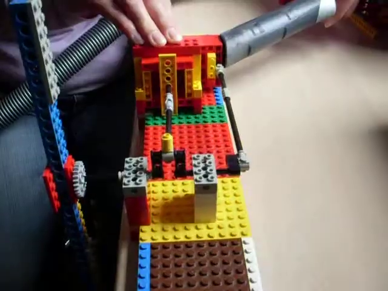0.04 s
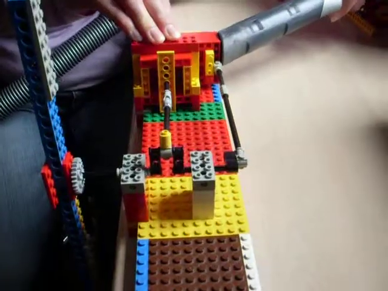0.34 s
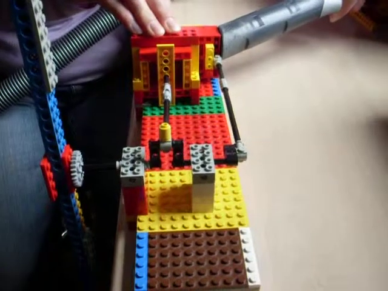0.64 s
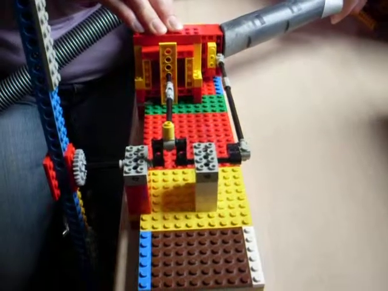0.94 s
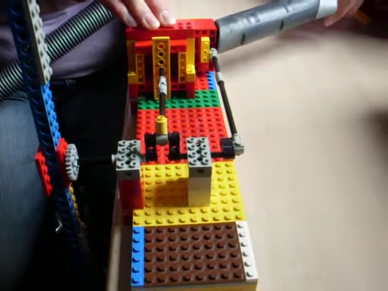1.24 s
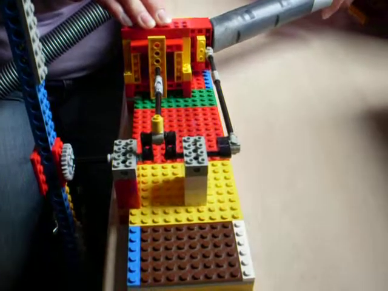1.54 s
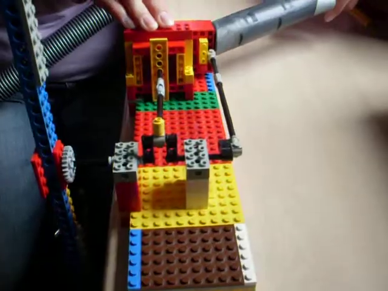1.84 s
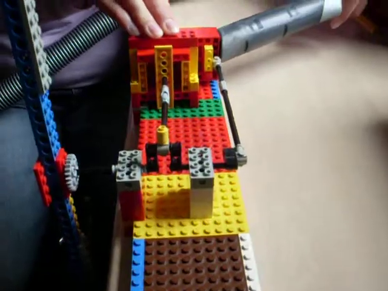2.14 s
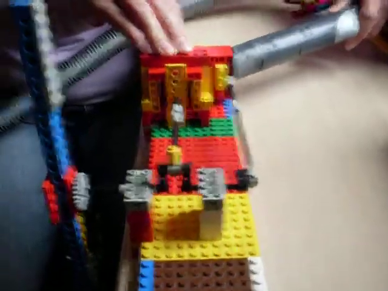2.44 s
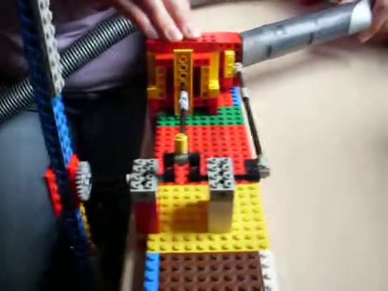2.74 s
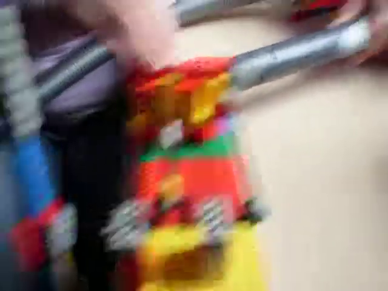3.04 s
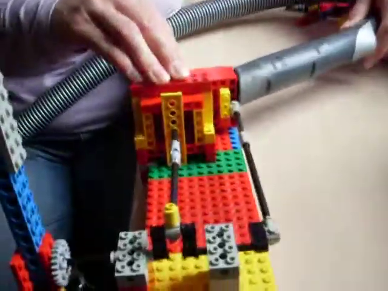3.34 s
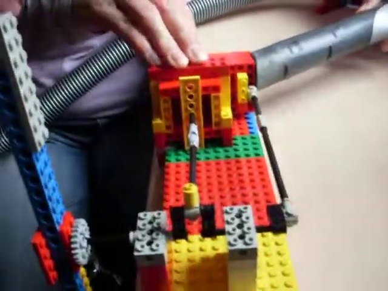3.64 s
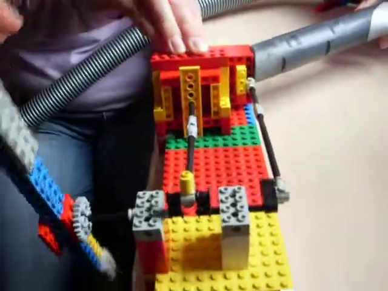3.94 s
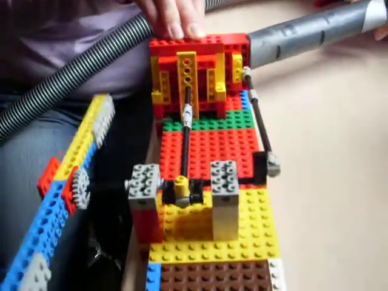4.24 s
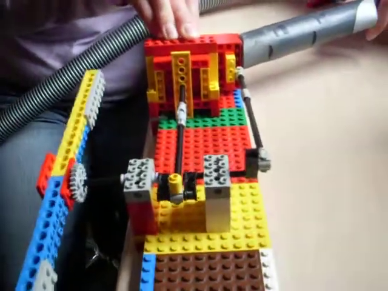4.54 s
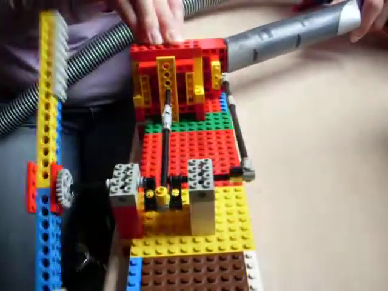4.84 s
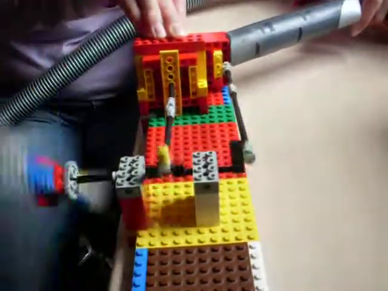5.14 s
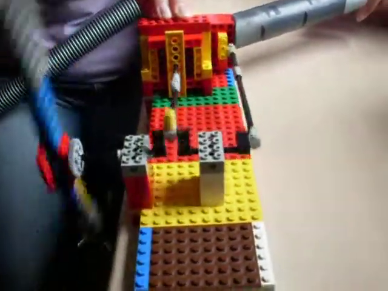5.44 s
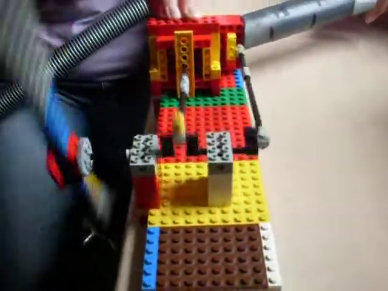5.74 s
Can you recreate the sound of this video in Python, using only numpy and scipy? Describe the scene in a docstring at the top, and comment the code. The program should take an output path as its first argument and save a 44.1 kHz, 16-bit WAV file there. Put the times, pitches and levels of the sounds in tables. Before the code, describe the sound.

A vacuum cleaner whines steadily as air hisses and whistles through a plastic brick engine, which starts chuffing near the end.

```python
"""A vacuum cleaner whines steadily while its hose sucks air through a toy engine of plastic bricks.
From the start, air rushes through the slide valve and hisses and whistles in gaps between the bricks.
After a light tap, a hand shifts the model on the table; it knocks at 1.4 s and is shifted again at 3 s.
Just after 4 s the crank is turned. Near 5 s the engine catches and chuffs faster and faster,
whistling on each suction stroke."""
import sys
import numpy as np
from scipy import signal
from scipy.fft import rfft, irfft
from scipy.io import wavfile

SR = 44100
rng = np.random.default_rng(int(sys.argv[2]) if len(sys.argv) > 2 else 0)


def wav_record(signal):
    """Record a signal, one row per channel, as 16-bit PCM in the file named by sys.argv[1]."""
    frames = np.transpose(np.atleast_2d(signal))
    bounded = np.clip(frames, -1, 1)
    # unit amplitude maps onto the largest positive 16-bit level
    quanta = np.round(bounded * 32767).astype(np.int16)
    wavfile.write(sys.argv[1], SR, quanta)


N = 260631
TIME = np.arange(N) / SR
FREQS = np.maximum(np.arange(N // 2 + 1) * SR / N, 1)

# speed of the cleaner's motor: time_s, turns_per_s
MOTOR_SPEED = [(0.05, 563.6), (0.75, 571.1), (1.2, 574.3), (1.5, 573.4), (2.0, 579.5), (2.6, 582.4),
               (3.1, 581.4), (3.4, 575.5), (4.15, 582), (5.0, 575.3), (5.85, 575.7)]
# drone of the unbalanced shaft: time_s, level_db
DRONE_LEVEL = [(0.5, -43.5), (0.95, -49.5), (1.8, -55.5), (2.2, -48), (4.0, -51), (5.91, -64)]
# whine at twice the shaft's rate: time_s, level_db
WHINE_LEVEL = [(0.15, -46), (0.55, -38.5), (0.95, -42), (2.3, -37), (3.3, -40), (3.7, -45.5), (4.35, -39.5),
               (4.6, -44.5), (5.25, -39.5)]
# thin whistle of the fan blades: time_s, level_db
BLADE_LEVEL = [(0, -58), (0.8, -42.5), (2.5, -41), (3.0, -47), (3.7, -48), (4.8, -39.5), (5.91, -39)]
# roar of the exhaust: frequency_hz, level_db (in a band 1 Hz wide)
ROAR_COLOUR = [(25, -104), (70, -105), (118, -87), (160, -99), (200, -80), (300, -84), (450, -79.5),
               (600, -77.5), (900, -76), (1200, -72.5), (2000, -72.5), (5000, -81.5)]
# where the cleaner's housing rings: pitch_hz, width_hz, lift_db
HOUSING_RINGS = [(261, 34, 5.5), (324, 35, 12.5), (414, 30, 1.5), (500, 60, 4), (642.4, 73, 11.5),
                 (709, 34, 6.5), (866, 72, 9.5), (945, 64, 8.5)]
# how much that ringing stands out: time_s, strength_factor
HOUSING_STRENGTH = [(0, 1.1), (4.0, 0.66), (4.6, 1.5), (5.91, 1.5)]
# echoes from nearby surfaces: delay_s, level_db
NEAR_ECHOES = [(.0031, -28.5), (.0074, -14), (0.0128, -14), (0.02, -23)]

# the model slides under the hand: start_s, end_s, level_db
HAND_SLIDES = [(1.154, 1.447, -46), (2.974, 3.35, -40.5)]
# tone of plastic scraping the table: frequency_hz, relative_db
SCRAPE_COLOUR = [(60, -34), (200, -11.5), (500, -1), (850, 2.5), (1500, -2.5), (1900, 2.5), (3000, 1),
                 (6000, -3.5)]
# short scuffs as it is shifted: time_s, length_s, scrape_db, rub_pitch_hz, rub_db
SLIDE_SCUFFS = [(1.187, 0.079, -55, 1400, -42), (1.338, 0.14, -35.5, 1470, -60),
                (2.995, 0.034, -33.5, 630, -37.5), (3.05, 0.057, -55, 1540, -33.5),
                (3.105, 0.045, -38, 894, -35), (3.197, 0.035, -36, 1150, -40),
                (3.257, 0.035, -37, 880, -48), (3.341, 0.022, -40, 1460, -33.5)]
# contacts of a light tap, then of the knock: start_s, strength_db, contact_s
CONTACTS = [(0.594, -21, 0.00031), (1.4416, -7.5, 0.00067), (1.4452, -14.5, 0.00021), (1.4465, -14, 0.0002),
            (1.4506, -19, 0.00031)]
# notes of the brick base on the table: pitch_hz, level_db, ring_s (time to fade by 60 dB)
BASE_NOTES = [(320, -8.5, 0.014), (444, -7, 0.02), (604, -15, 0.028), (835, -12.5, 0.049),
              (1060, -8.5, 0.018), (1460, -9, 0.02), (1620, -4, 0.019), (1720, -1, 0.016),
              (2350, -20, .015)]

# tone of the rush at the valve: frequency_hz, relative_db
RUSH_COLOUR = [(100, -43), (300, -13), (700, -5.5), (1400, -7.5), (2000, -3.5), (2700, 2), (3150, -5),
               (3700, -3), (4200, -2), (5200, -2), (5900, -2), (7000, -20), (9000, -27)]
# where the cylinder's cavities ring: pitch_hz, width_hz, lift_db
CYLINDER_RINGS = [(1484, 244, 9.5), (1836, 210, 7), (2380, 330, 6.5), (3550, 470, 4), (3960, 280, 1.5),
                  (4670, 520, 7), (5510, 94, 10), (5960, 260, -5)]
# the same with the piston near mid-stroke: pitch_hz, width_hz, lift_db
MID_STROKE_RINGS = [(1410, 240, 10), (1760, 310, -9.5), (2240, 240, 6), (3510, 540, 5.5), (4350, 320, 5),
                    (4800, 330, 2.5), (5340, 450, 3.5)]
# how near the piston rests to mid-stroke: time_s, share (0 to 1)
MID_STROKE_SHARE = [(2.95, 0), (3.2, 1), (4.1, 0.4), (4.3, 0.2)]
# tone of the hiss at the leaks: frequency_hz, relative_db
LEAK_COLOUR = [(3000, -31), (5000, -7.5), (5850, -0.5), (6200, 3), (7100, 2), (7550, 2), (8000, -13.5),
               (9000, -42)]
# tone of the higher hiss at the narrowest cracks: frequency_hz, relative_db
CRACK_COLOUR = [(6000, -36), (8000, 5), (8600, 4.5), (9500, 1.5), (10300, 1.5), (11000, -4), (11700, -12.5),
                (12300, -63)]
# strength of that higher hiss with the valve shut: time_s, level_db
CRACK_LEVEL = [(0.03, -43.5), (0.14, -41), (0.28, -39.5), (0.51, -44), (1.67, -44), (2.9, -40.5),
               (3.28, -43.5), (3.72, -40.5), (4.12, -41)]
# where the hollows under the bricks ring: pitch_hz, width_hz, lift_db
HOLLOW_RINGS = [(6100, 160, 1), (6660, 570, 2), (7040, 68, 2), (8950, 250, 5), (9700, 250, 5),
                (10100, 250, 1.5)]
# the hand's grip shifts the bricks and air surges past: start_s, end_s, rush_change_db, leak_change_db
GRIP_SURGES = [(-0.1, 0.47, 3.5, 0.5), (0.25, 0.457, 3, 2), (0.542, 0.944, 1.3, 2), (1.09, 1.48, 2, 1),
               (1.113, 1.292, 0.5, 3), (2.586, 3.36, 1.5, 1.5), (3.02, 3.137, 2.5, 5.5),
               (3.156, 3.26, -0.5, -16), (4.16, 4.34, 5.5, 3.5)]
# gaps that sing while the crank stands or creeps: start_s, end_s, pitch_hz, level_db
GAP_NOTES = [(-0.05, 0.465, 3806, -36.5), (-0.05, 0.465, 2500, -45), (0.25, 0.448, 4556, -31),
             (0.5, 1.14, 6350, -50), (1.1, 2.6, 5370, -44.5), (1.1, 3.0, 3615, -43.5),
             (1.5, 3.0, 4564, -42), (2.5, 4.1, 7050, -37), (2.65, 4.15, 9460, -47),
             (2.698, 3.025, 2414, -37.5), (3.15, 4.1, 4270, -40), (3.2, 3.294, 2300, -33),
             (3.3, 4.3, 2220, -47.5), (4.17, 4.298, 10450, -42), (4.213, 4.35, 3605, -31),
             (4.26, 4.392, 6080, -30), (4.658, 4.79, 3920, -31), (4.778, 4.94, 3660, -26),
             (4.86, 4.93, 5100, -26)]

# the hand starts the crank: time_s, turns (0 is the start of the first suction stroke)
HAND_CRANK = [(4.1, -0.14), (4.27, 0.01), (4.4, 0.096), (4.9, 0.085), (4.94, 0.22), (5.03, 0.385)]
# notes of each suction stroke: start_turns, end_turns, mid_stroke_hz, droop_hz, width_hz, level_db
VALVE_NOTES = [(0.01, 0.42, 5406, -0.5, 900, -33.5), (0.085, 0.27, 3970, 300, 520, -29),
               (0.135, 0.41, 5430, 850.5, 373, -24.5), (0.37, 0.493, 3900, 400, 450, -28.5)]
# tone of a chuff's gulp of air: frequency_hz, relative_db
GULP_COLOUR = [(300, -26), (1000, -11), (1900, -3), (3100, -6.5), (4200, -1.5), (5500, 2.5), (6600, -0.5),
               (7800, -22), (9500, -28), (10200, -7), (11000, -25), (12000, -29)]
# chuffs as the valve changes over: time_s, length_s, gulp_db, bark_pitch_hz, bark_db
VALVE_CHUFFS = [(5.097, 0.017, -22.5, 2330, -27.5), (5.235, .018, -21.5, 2400, -33),
                (5.45, 0.017, -26.5, 2220, -32.5), (5.562, 0.014, -24, 2150, -41),
                (5.747, 0.019, -25, 2200, -29.5), (5.849, 0.013, -23, 2300, -30)]


def from_db(db):
    """Turn decibels into a factor to multiply by."""
    return 10 ** (np.asarray(db) / 20)


def rms_one(x):
    """Scale a signal so its average strength (rms) is 1."""
    return x / np.sqrt(np.mean(x ** 2) + 1e-20)


def curve(rows):
    """Join (time, value) points with straight lines."""
    return np.interp(TIME, *np.transpose(rows))


def swell(time_s, length_s):
    """A bell-shaped rise and fall around a moment."""
    return np.exp(-np.minimum(((TIME - time_s) / length_s) ** 2, 100) / np.sqrt(2))


def gate(x, start, end, edge):
    """Near 1 between start and end and 0 outside, with soft edges."""
    return (1 + np.tanh((x - start) / edge)) * (1 + np.tanh((end - x) / edge)) / 4


def drift(rate_hz):
    """A smooth random wobble of size 1 that changes about rate_hz times a second."""
    step, warm_up = 40, 2000
    r = np.exp(-2 * np.pi * step * rate_hz / SR)
    noise = rng.standard_normal(N // step + warm_up + 2)
    slow = signal.lfilter([1], [1, -2 * r, r * r], noise)[warm_up:]
    return np.interp(np.arange(N) / step, np.arange(len(slow)), rms_one(slow))


def colour(x, spectrum, rings=()):
    """Make some frequencies louder than others, with a bump or dip for each ring."""
    hz, db = np.transpose(spectrum)
    shape_db = np.interp(np.log(FREQS), np.log(hz), db)
    shape_db -= 24 * np.log2(np.maximum(FREQS / hz[-1], 1))  # fall 24 dB an octave past the last row
    for centre, width, lift in rings:
        shape_db += lift / (1 + (2 * (FREQS - centre) / width) ** 4)
    return irfft(rfft(x) * from_db(shape_db), N)


def resonate(x, hz, width_hz):
    """Keep the part of a sound near one pitch."""
    r = np.exp(-np.pi * width_hz / SR)
    feedback = [1, -2 * r * np.cos(2 * np.pi * hz / SR), r * r]
    return signal.lfilter(np.array([1, 0, -1]) * (1 - r * r) / 2, feedback, x)


def turbulence(flutter_db, flutter_hz):
    """White noise whose strength flutters as the air swirls."""
    return rms_one(rng.standard_normal(N) * from_db(flutter_db * drift(flutter_hz)))


def breathy_note(hz, width_hz, skirt=2.7):
    """A note blurred by the slow swirls in a jet of air."""
    swirl = rng.standard_normal((2, N))
    for band_hz in (width_hz, width_hz * skirt, 2 * width_hz * skirt):
        swirl = signal.lfilter([1], [1, -np.exp(-np.pi * band_hz / SR)], swirl)
    phase = 2 * np.pi * np.cumsum(hz * np.ones(N)) / SR
    return rms_one(swirl[0] * np.cos(phase) + swirl[1] * np.sin(phase))


def room_rumble(level_db=-80, top_hz=65):
    """The room rumbles, faint and low."""
    low_pass = signal.butter(2, top_hz, "low", fs=SR, output="sos")
    return from_db(level_db) * rms_one(signal.sosfilt(low_pass, rng.standard_normal(N)))


def add_echoes(x):
    """The table and nearby walls send back short echoes."""
    return x + sum(from_db(db) * np.interp(TIME - delay, TIME, x, left=0) for delay, db in NEAR_ECHOES)


def vacuum_cleaner(blade_count=9, hum_hz=100, hum_db=-70.5, waver_db=0.5, whine_waver_db=0.27):
    """The spinning shaft and fan sing, the mains hums, and the exhaust's roar rings the housing."""
    angle = 2 * np.pi * np.cumsum(curve(MOTOR_SPEED) + 0.25 * drift(6)) / SR
    whine = from_db(curve(WHINE_LEVEL) + whine_waver_db * drift(5.4)) * np.sin(2 * angle)
    drone = from_db(curve(DRONE_LEVEL) + waver_db * drift(13)) * np.sin(angle)
    blades = from_db(curve(BLADE_LEVEL) + waver_db * drift(2.9)) * np.sin(blade_count * angle)
    hum = from_db(hum_db) * np.sin(2 * np.pi * hum_hz * TIME)
    exhaust = rng.standard_normal(N) * np.sqrt(SR / 2)
    roar = colour(exhaust, ROAR_COLOUR)
    ringing = colour(exhaust, ROAR_COLOUR, HOUSING_RINGS) - roar
    return np.sqrt(2) * (whine + drone + blades + hum) + roar + curve(HOUSING_STRENGTH) * ringing


def sliding(slips_per_s=5000, rub_width_share=0.072):
    """Plastic slips over the table in tiny jerks; each scuff rings a different part of the model."""
    slips = (rng.random(N) < slips_per_s / SR) * rng.standard_normal(N) + 1e-18
    scrape = rms_one(colour(slips, SCRAPE_COLOUR))
    out = scrape * sum(from_db(db) * gate(TIME, start, end, edge=0.05) for start, end, db in HAND_SLIDES)
    for time_s, length_s, scrape_db, hz, rub_db in SLIDE_SCUFFS:
        rub = rms_one(resonate(slips, hz, rub_width_share * hz))
        out += swell(time_s, length_s) * (from_db(scrape_db) * scrape + from_db(rub_db) * rub)
    return out


def knocks(lowest_hz=230):
    """Each contact rings the hollow base, too small to give out bass; brief contacts sound brighter."""
    force, out = np.zeros(N), np.zeros(N)
    for start_s, db, contact_s in CONTACTS:
        push = np.sin(np.pi * np.clip((TIME - start_s) / contact_s, 0, 1)) ** 2
        force += from_db(db) * push / push.sum()
    for k, (hz, db, ring_s) in enumerate(BASE_NOTES):
        fade, step = from_db(-60 / (ring_s * SR)), 2 * np.pi * hz / SR
        ring = signal.lfilter([0, np.sin(step)], [1, -2 * fade * np.cos(step), fade ** 2], force + 1e-18)
        out += (-1) ** k * from_db(db) * ring
    return signal.sosfilt(signal.butter(2, lowest_hz, "high", fs=SR, output="sos"), out)


def crank_place(last_stroke_s=0.11):
    """Where the crank is in its turn, from -0.25 to 0.75; 0 to 0.5 is the suction stroke."""
    stroke_ends = [row[0] for row in VALVE_CHUFFS] + [VALVE_CHUFFS[-1][0] + last_stroke_s]
    half_turns = [(time_s, (k + 1) / 2) for k, time_s in enumerate(stroke_ends)]
    turns = curve(list(HAND_CRANK) + half_turns)
    return (turns + 0.25) % 1 - 0.25


def airflow(shut_rush_db=-32.5, shut_leak_db=-33.0):
    """Air rushing through the valve rings the cylinder; leaks hiss, and narrower cracks hiss higher."""
    valve_open = gate(crank_place(), start=0.046, end=0.51, edge=0.041)
    # the open valve takes air away from the leaks and cracks
    rush_db = shut_rush_db + valve_open
    leak_db = shut_leak_db - 3 * valve_open
    crack_db = curve(CRACK_LEVEL) - 4 * valve_open
    for start_s, end_s, rush_change_db, leak_change_db in GRIP_SURGES:
        surge = gate(TIME, start_s, end_s, edge=0.028)
        rush_db += rush_change_db * surge
        leak_db += leak_change_db * surge
    jet = turbulence(flutter_db=0.87, flutter_hz=36)
    mid = curve(MID_STROKE_SHARE)  # the piston's place changes the cavities
    rush = (1 - mid) * rms_one(colour(jet, RUSH_COLOUR, CYLINDER_RINGS))
    rush += mid * rms_one(colour(jet, RUSH_COLOUR, MID_STROKE_RINGS))
    leak = rms_one(colour(turbulence(flutter_db=0.5, flutter_hz=44), LEAK_COLOUR, HOLLOW_RINGS))
    cracks = rms_one(colour(turbulence(flutter_db=0.6, flutter_hz=78), CRACK_COLOUR, HOLLOW_RINGS))
    return from_db(rush_db) * rush + from_db(leak_db) * leak + from_db(crack_db) * cracks


def gap_whistles(width_hz=270, edge_s=0.029, edge_share=0.09):
    """Each gap sings one breathy note; the longer it stays open, the more slowly it comes and goes."""
    out = np.zeros(N)
    for start_s, end_s, hz, db in GAP_NOTES:
        opening = gate(TIME, start_s, end_s, edge_s + edge_share * (end_s - start_s))
        out += from_db(db) * opening * breathy_note(hz, width_hz)
    return out


def valve_whistles(edge_turns=0.04):
    """On each suction stroke the whistle jumps up and back; its pitch droops as the piston slows."""
    place, out = crank_place(), np.zeros(N)
    piston_speed = np.abs(np.sin(2 * np.pi * place))
    for start, end, mid_stroke_hz, droop_hz, width_hz, db in VALVE_NOTES:
        note = breathy_note(mid_stroke_hz - droop_hz * (1 - piston_speed), width_hz)
        out += from_db(db) * gate(place, start, end, edge_turns) * note
    return out


def chuffs(bark_width_hz=900, lopsided=1.16):
    """Twice a turn the valve uncovers a hole and air barks through, starting faster than it dies."""
    air = turbulence(flutter_db=2.0, flutter_hz=78)
    gulp, out = rms_one(colour(air, GULP_COLOUR)), np.zeros(N)
    for time_s, length_s, gulp_db, hz, bark_db in VALVE_CHUFFS:
        bark = rms_one(resonate(resonate(air, hz, bark_width_hz * 2), hz, bark_width_hz))
        rise, fall = swell(time_s, length_s / lopsided), swell(time_s, length_s * lopsided)
        opening = np.where(TIME < time_s, rise, fall)
        out += opening * (from_db(gulp_db) * gulp + from_db(bark_db) * bark)
    return out


def scene():
    """The engine close by, too small to give out bass; the cleaner further off; the room behind."""
    engine = airflow() + gap_whistles() + valve_whistles() + chuffs() + sliding() + knocks()
    engine = signal.sosfilt(signal.butter(2, 150, "high", fs=SR, output="sos"), engine)
    return (room_rumble() + vacuum_cleaner() + add_echoes(engine))[None]


def record(dry):
    """Cut away the highest treble steeply."""
    cutoff_hz = 12300
    return signal.sosfilt(signal.ellip(10, 0.1, 80, cutoff_hz, fs=SR, output="sos"), dry)


dry = scene()
out = record(dry)
wav_record(out)
```